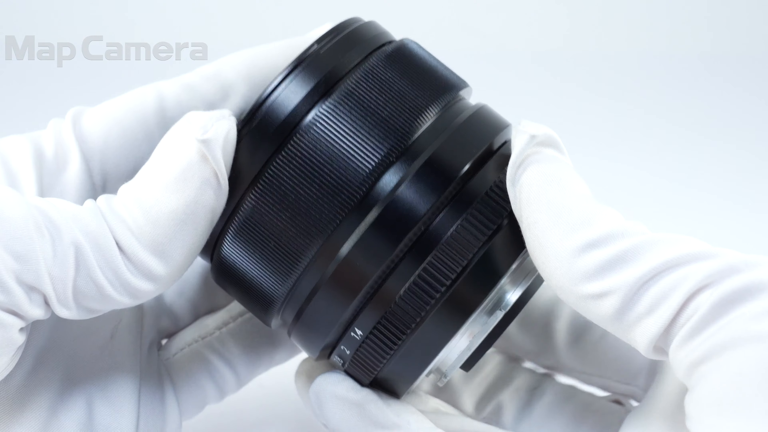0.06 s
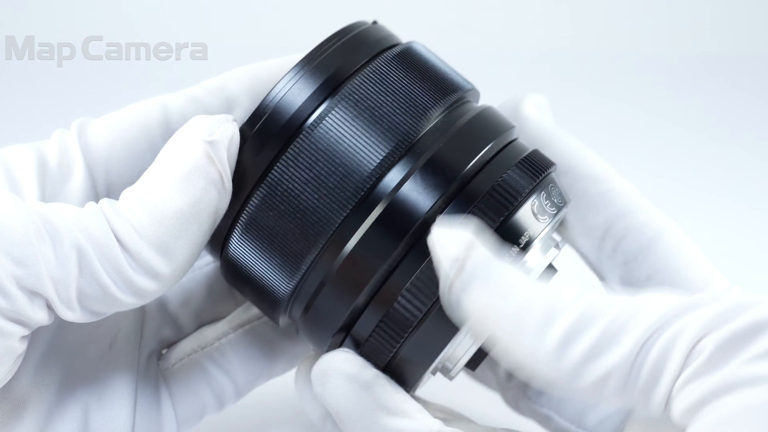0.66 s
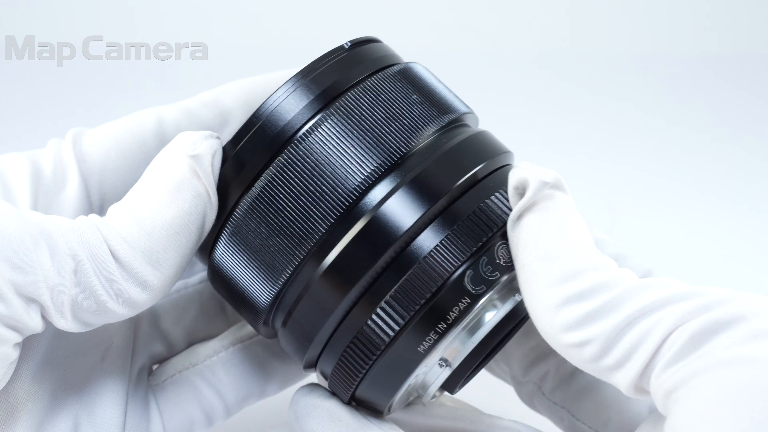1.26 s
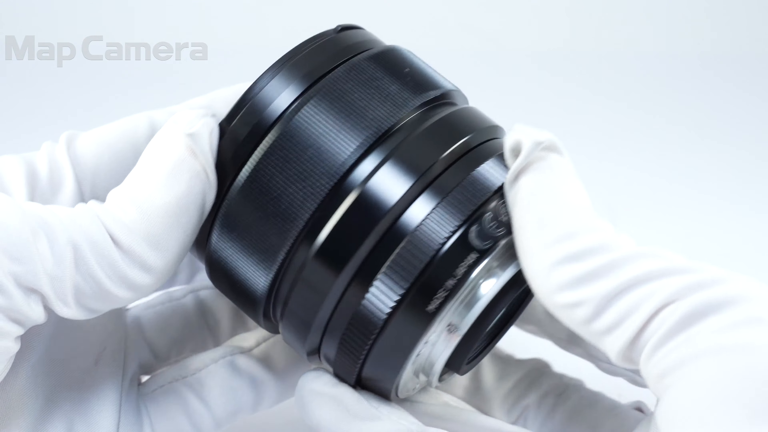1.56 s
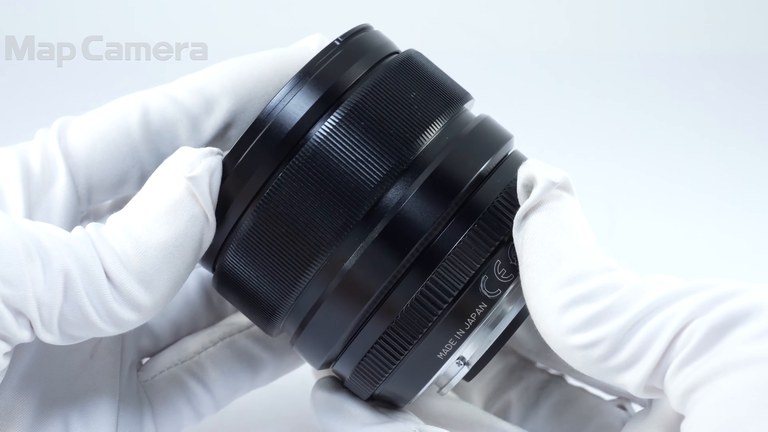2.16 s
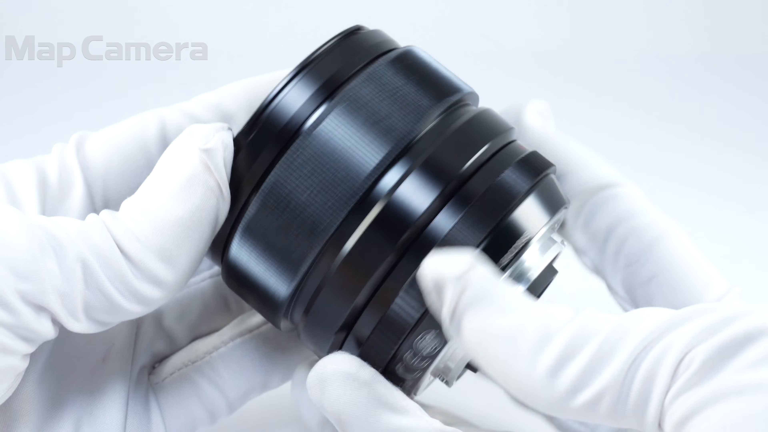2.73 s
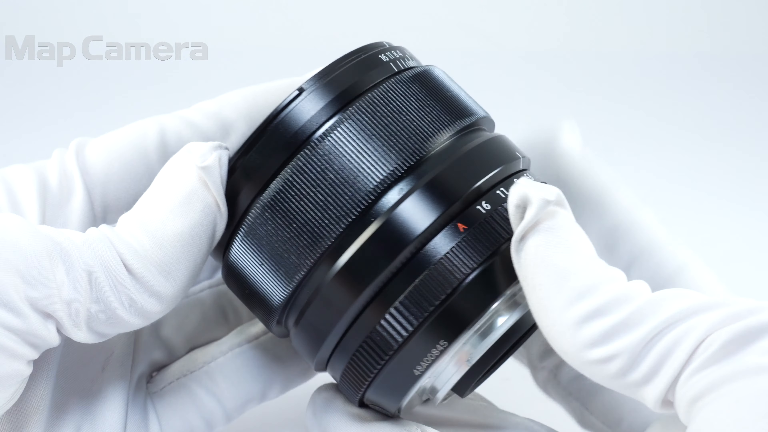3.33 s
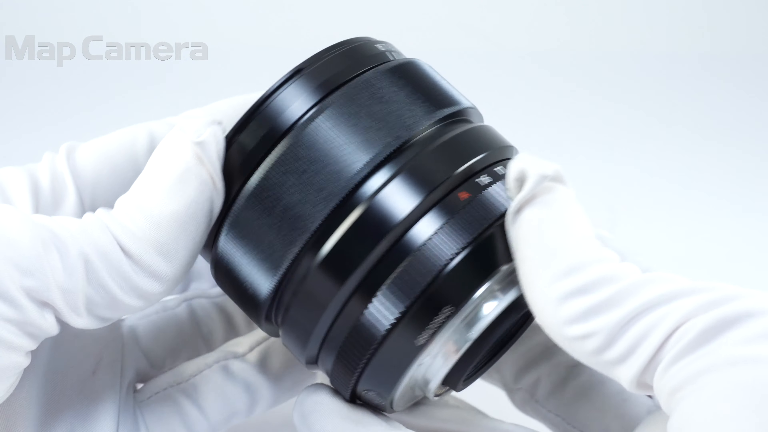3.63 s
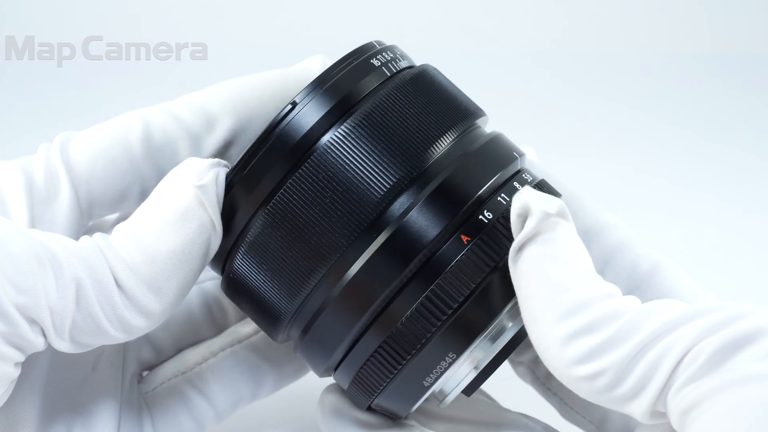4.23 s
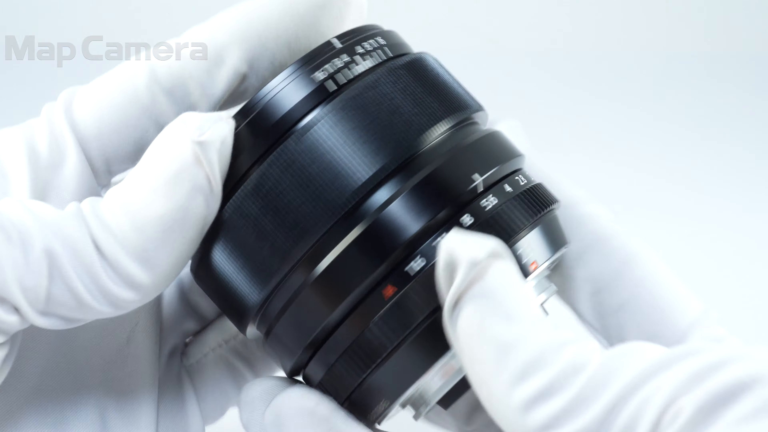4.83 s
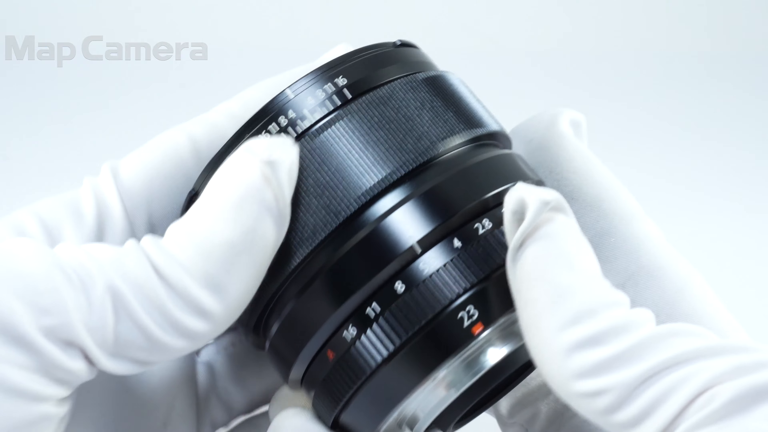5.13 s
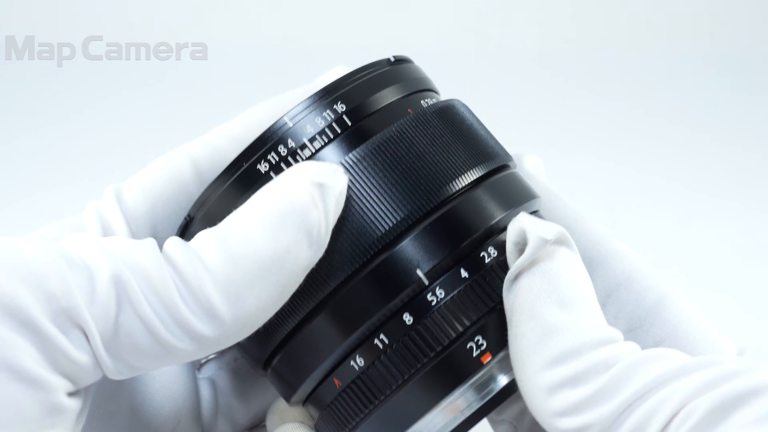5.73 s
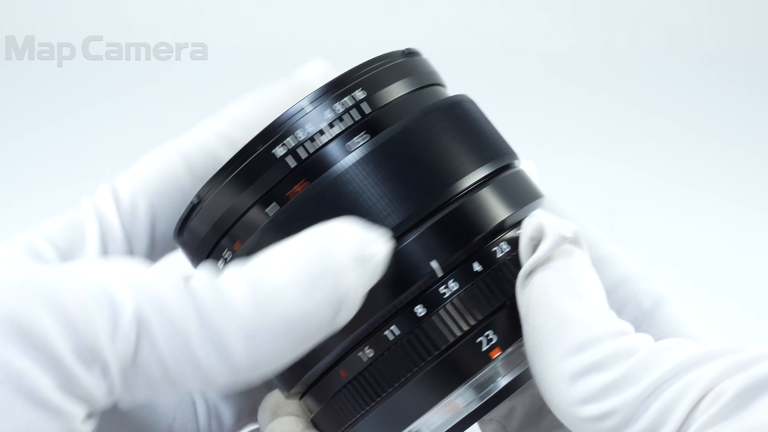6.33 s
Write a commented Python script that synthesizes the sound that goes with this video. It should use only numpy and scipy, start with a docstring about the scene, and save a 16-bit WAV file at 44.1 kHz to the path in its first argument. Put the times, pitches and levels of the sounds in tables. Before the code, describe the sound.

Gloved hands turn a camera lens close to the microphone in a small room with steady ventilation and a faint hum. Cotton hisses and rasps softly over the ribbed barrel in uneven strokes, with finger scuffs, dull bumps and a few faint squeaks. Near the end the focus ring snaps into place with one loud, sharp click, followed by a small tick and a brief hollow rub as it turns.

```python
"""A small, humming room, the microphone close in front of gloved hands turning a camera lens.
Cotton hisses, rasps and squeaks as it slides over the ribbed barrel; fingers scuff and bump it.
Near the end the focus ring is pulled back, skids over its detent and snaps into its seat, ringing
the barrel; then it ticks and is turned, rubbing in its track. Ventilation runs underneath."""
import sys
import numpy as np
from scipy import signal
from scipy.fft import rfft, irfft, next_fast_len
from scipy.io import wavfile
from scipy.ndimage import uniform_filter1d

SR = 44100
rng = np.random.default_rng(int(sys.argv[2]) if len(sys.argv) > 2 else 0)


def pcm_store(signal):
    """Save signal as 16-bit PCM."""
    levels = np.round(np.clip(np.atleast_2d(signal), -1, 1) * 32767)
    wavfile.write(sys.argv[1], SR, levels.astype(np.int16).T)


N = 290178
TIME = np.arange(N) / SR

# ventilation in the room: (frequency [Hz], relative level [dB])
AIR_SPECTRUM = [(20, -19), (40, -11), (65, 0.5), (90, 4), (125, -4), (165, -4.5), (230, 0), (320, 3.5),
                (700, -5.5), (1100, -6.5), (1750, -6.5), (2150, -14.5), (5000, -22.5), (16000, -29)]
# electrical hum and whine: (frequency [Hz], rms level [dB])
HUM_TONES = [(100, -59.5), (226, -63.5), (300, -63), (13205, -78.5)]
# cotton on the ribs, sliding lightly, dragged firmly, flicked fast: (frequency [Hz], relative level [dB])
HISS_SPECTRUM = [(900, -21), (2500, -13), (4500, -1.5), (7000, 2.5), (9000, -0.5), (11500, -3.5),
                 (14000, -7.5), (16000, -15)]
RASP_SPECTRUM = [(500, -16), (1200, -0.5), (2300, -1.5), (3700, 2.5), (5000, -3), (8000, -19.5),
                 (16000, -40)]
SHEEN_SPECTRUM = [(4000, -31), (8000, -4), (11300, 0), (12800, -4), (16000, -6)]
# slow drags of the barrel through the grip: (start [s], end [s], starting level [dB], pressure [0-1])
GLOVE_DRAGS = [(0.0, 0.023, -53, 0), (0.092, 0.303, -53.5, 0.59), (0.404, 0.582, -58.5, 0.63),
               (0.568, 0.665, -51.5, 0.53), (0.728, 0.867, -54.5, .55), (0.87, 1.042, -50, 0.4),
               (1.147, 1.24, -64, 0.2), (1.37, 1.54, -63.5, 0.4), (1.95, 2.278, -59.5, .45),
               (2.25, 2.855, -56.5, .5), (2.857, 3.257, -62, 0.47), (3.272, 3.34, -52, .33),
               (3.554, 3.73, -64, 0.8), (3.863, 3.933, -60, .35), (4.19, 4.3, -63.5, 0.8),
               (4.38, 4.445, -53.5, 0.37), (4.463, 4.657, -50.5, 0.63), (4.677, 4.916, -55.5, 0.48),
               (4.883, 5.37, -51.5, 0.72), (5.463, 5.515, -58.5, .6), (5.814, 5.876, -59.5, .8),
               (5.991, 6.1, -49.5, .7), (6.28, 6.582, -55.5, .6), (6.377, 6.483, -50, 0.8)]
# quick flicks over the ribs: (start [s], end [s], hiss [dB], rasp [dB], sheen [dB])
GLOVE_FLICKS = [(0.78, 0.802, -51, -54, -54), (0.918, 0.974, -45.5, -47, -59),
                (1.266, 1.35, -49.5, -56, -64), (1.33, 1.353, -44, -49, -44),
                (1.577, 1.609, -43.5, -51.5, -49), (1.624, 1.672, -47, -61, -47),
                (2.486, 2.573, -56, -76, -49), (3.348, 3.445, -49.5, -52, -57.5),
                (4.09, 4.188, -50, -53, -53.5), (5.014, 5.072, -49.5, -55, -50),
                (6.018, 6.056, -45, -44, -56)]
# handling bumps and, last, a very brief low thump under the snap as it overloads the recorder:
# (peak time [s], pitch [Hz], length [s], level [dB])
LOW_THUMPS = [(0.171, 240, 0.011, -41), (0.257, 293, 0.0079, -38), (0.28, 76.4, 0.017, -35.5),
              (0.323, 85, 0.019, -40), (2.972, 194, 0.011, -40), (3.218, 86, .02, -49),
              (3.391, 228, .02, -45), (4.031, 222, .025, -47), (5.603, 203, 0.0094, -35.5),
              (5.648, 131, 0.0027, -25.5)]
# fingers shifting their grip: (peak time [s], length [s], centre [Hz], width [Hz], level [dB])
FINGER_SCUFFS = [(0.193, 0.059, 230, 80, -46.5), (0.194, 0.13, 1190, 1200, -53),
                 (0.217, 0.085, 60, 60, -48.5), (0.412, 0.013, 250, 398, -49),
                 (0.773, 0.04, 1190, 1100, -50.5), (0.984, 0.019, 1690, 1000, -47),
                 (1.115, 0.018, 1300, 900, -55), (1.204, .015, 900, 900, -53),
                 (1.506, 0.012, 870, 696, -47.5), (1.937, .025, 1870, 1500, -52.5),
                 (2.347, 0.0044, 686, 700, -42.5), (2.354, 0.022, 786, 700, -46),
                 (2.372, .035, 480, 400, -47.5), (2.54, .06, 65, 50, -55), (3.501, 0.035, 420, 200, -47),
                 (4.338, 0.015, 1300, 650, -45), (4.355, 0.029, 402, 650, -44.5),
                 (4.69, 0.14, 302, 497, -50), (4.713, 0.068, 1110, 1100, -46),
                 (4.742, 0.012, 1670, 1500, -44.5), (4.811, 0.022, 1540, 1200, -49.5),
                 (5.41, 0.15, 224, 172, -50)]
# hard contacts inside the lens: (time [s], gain [dB], low edge [Hz], high edge [Hz])
LENS_CONTACTS = [(5.6454, -15, 1100, 7000), (5.6466, 1, 760, 12500), (5.6515, -6, 760, 3200),
                 (5.8793, -25.5, 1400, 3600), (5.8813, -31, 2500, 11000), (6.2125, -42, 3200, 9000),
                 (2.2, -35, 7000, 15000), (2.2275, -35, 7000, 15000), (3.603, -40, 8000, 15000)]
# modes of the barrel: (frequency [Hz], relative level [dB], t60 [s])
BARREL_MODES = [(870, -19, 0.026), (894, -5, 0.052), (1073, 2, 0.012), (1276, -10, 0.039),
                (1420, -21, 0.037), (1645, -11.5, 0.019), (1846, -11.5, 0.019), (2110, -6.5, 0.013),
                (2250, -10.5, 0.019), (2450, -17, 0.035), (2710, -14, 0.014), (3140, -25, 0.044),
                (3280, -28, 0.046), (3660, -24, 0.02), (4070, -19.5, 0.041), (4550, -19, 0.029),
                (4970, -10.5, 0.015), (5580, -38, 0.019), (7450, -38, 0.019), (7500, -36, .02),
                (9650, -41, 0.02), (10940, -20, .022), (13800, -24, .022)]
# the room's tail: (low edge [Hz], high edge [Hz], gain [dB], t60 [s])
ROOM_BANDS = [(480, 800, -15.5, 0.14), (1380, 4100, -11.5, 0.07), (3530, 6400, -14.5, 0.051),
              (7000, 16000, -15, 0.052)]
# cloth squeaking on the barrel: (peak time [s], length [s], pitch [Hz], level [dB])
CLOTH_SQUEAKS = [(2.903, 0.056, 3500, -57.5), (4.103, 0.041, 2740, -57.5), (6.047, 0.044, 3760, -50.5)]
# the ring's skid just before it seats: (time [s], length [s], level [dB], first pitch [Hz], last [Hz])
DETENT_SKID = (5.6438, .003, -17, 7700, 9000)
# grit in that skid: (frequency [Hz], relative level [dB])
GRIT_SPECTRUM = [(500, -42), (2000, -15), (4500, -11), (6500, 1), (8500, -16), (10000, -1.5), (12500, 0.5),
                 (14500, 4), (16000, -3.5)]
# the focus ring turning: (peak time [s], length [s], level [dB])
RING_TURN = (6.43, 0.11, -48)
# resonances of the ring's track: (frequency [Hz], width [Hz], relative level [dB])
TRACK_MODES = [(850, 83, 2), (1037, 77, -3.5), (3050, 540, -5), (8000, 1500, -10)]


def undb(db):
    """Decibels to gain."""
    return 10 ** (np.asarray(db) / 20)


def unit(x):
    """Scale to rms 1."""
    return x / np.sqrt(np.mean(x ** 2))


def colour(x, points):
    """Shape a steady sound by (frequency [Hz], level [dB]) points; rms 1."""
    hz, db = np.transpose(points)
    size = next_fast_len(len(x))
    bins_hz = np.maximum(np.fft.rfftfreq(size, 1 / SR), 1)
    gain = undb(np.interp(np.log(bins_hz), np.log(hz), db))
    return unit(irfft(rfft(x, size) * gain, size)[:len(x)])


def band(x, low_hz, high_hz, order=2):
    """Causal band-pass."""
    return signal.sosfilt(signal.butter(order, [low_hz, high_hz], "band", fs=SR, output="sos"), x)


def resonance(x, hz, width_hz):
    """One resonance driven by x; rms 1."""
    low_hz = np.hypot(hz, width_hz / 2) - width_hz / 2
    return unit(band(x, low_hz, low_hz + width_hz))


def wander(rate_hz):
    """A smooth random drift; rms 1."""
    hold = int(SR / rate_hz)
    steps = np.repeat(rng.standard_normal(N // hold + 1), hold)
    return unit(uniform_filter1d(uniform_filter1d(steps, hold), hold)[:N])


def swell(peak_s, length):
    """A bell-shaped rise and fall, `length` seconds wide at half power."""
    return 2 ** (-2 * np.minimum(((TIME - peak_s) / length) ** 2, 20))


def room_tone(air_db=-51.5):
    """Steady ventilation, a slightly wavering hum and a thin electrical whine."""
    air = colour(rng.standard_normal(N), AIR_SPECTRUM) * undb(air_db + 0.95 * wander(6.8))
    hum = sum(undb(db) * unit(np.sin(2 * np.pi * hz * TIME + 0.28 * wander(4.04)))
              for hz, db in HUM_TONES)
    return air + hum


def fibres(per_s, spread_db):
    """Threads catching and letting go: dense slips of uneven size."""
    slips = rng.random(N) < per_s / SR
    return unit(slips * rng.standard_normal(N) * undb(spread_db * rng.standard_normal(N)))


def slide(start, end, rise_s, fall_s):
    """Speed of the cloth, 0-1: it breaks loose, slides, and is caught again."""
    return (1 + np.tanh((TIME - start) / rise_s)) * (1 - np.tanh((TIME - end) / fall_s)) / 4


def pressed(pressure):
    """Gains of hiss, rasp and sheen in slow sliding: pressure turns hiss into rasp; no sheen."""
    return np.sqrt([1 - pressure, pressure, 0])


def gloves(grip_db=-69, sag_db_per_s=3, flutter_db=0.64):
    """Cotton hisses as it slides, rasps lower when pressed on the ribs and gains a sheen with speed."""
    creep = undb(grip_db - 0.5 * wander(5.3))  # the resting grip never quite stops
    power = np.outer(pressed(0.84), creep) ** 2  # rows: hiss, rasp, sheen
    for start, end, db, pressure in GLOVE_DRAGS:
        slowing = undb(-sag_db_per_s * np.maximum(TIME - start, 0))  # the hand slows as it drags
        speed = slowing * slide(start, end, rise_s=0.02, fall_s=0.035)
        power += np.outer(undb(db) * pressed(pressure), speed) ** 2
    for start, end, *levels_db in GLOVE_FLICKS:
        speed = slide(start, end, rise_s=0.017, fall_s=0.031)
        power += np.outer(undb(levels_db), speed) ** 2
    spectra = HISS_SPECTRUM, RASP_SPECTRUM, SHEEN_SPECTRUM
    cloth = sum(gain * colour(fibres(per_s=10000, spread_db=1), spectrum)
                for gain, spectrum in zip(np.sqrt(power), spectra))
    return cloth * undb(flutter_db * wander(70))


def thumps():
    """Dull, low pulses: bumps from handling, then a very brief thump under the snap's overload."""
    return -sum(np.cos(2 * np.pi * hz * (TIME - peak_s)) * swell(peak_s, length) * undb(db)
                for peak_s, hz, length, db in LOW_THUMPS)


def fingers():
    """Fingertips stick and slip in short scuffs."""
    out = np.zeros(N)
    for peak_s, length, hz, width_hz, db in FINGER_SCUFFS:
        scuff = resonance(fibres(per_s=5000, spread_db=1), hz, width_hz)
        out += scuff * swell(peak_s, length) * undb(db)
    return out


def barrel_ring(t):
    """The barrel's answer to one sharp push; the hands damp it quickly."""
    return sum(undb(db - 60 * t / t60) * np.sin(2 * np.pi * hz * t) for hz, db, t60 in BARREL_MODES)


def clicks(ring_db=-3, crack_db=-10, crack_s=0.0022):
    """Each contact inside the lens rings the barrel, with a brief crack of dense high modes."""
    out = np.zeros(N)
    t = TIME[:SR // 5]
    ring = barrel_ring(t) * undb(ring_db)
    for time_s, db, low_hz, high_hz in LENS_CONTACTS:
        crack = unit(band(rng.standard_normal(len(t)), 2100, 12000, order=1)) * np.exp(-t / crack_s)
        hit = band(ring + crack * undb(crack_db), low_hz, high_hz, order=4)
        start = int(time_s * SR)
        out[start:start + len(t)] += undb(db) * hit[:N - start]
    return out


def room_tail(x, delay_s=0.0024):
    """A short, dry tail comes back to the microphone from the table and the near walls."""
    t = TIME[:SR // 4]
    tail = 0
    for low_hz, high_hz, db, t60 in ROOM_BANDS:
        fade = undb(-60 * t / t60) * (t > delay_s)
        reflections = band(rng.standard_normal(len(t)), low_hz, high_hz)
        tail += undb(db) * reflections * fade / np.linalg.norm(fade)
    return signal.fftconvolve(x, tail)[:N]


def squeaks(relative_width=0.075):
    """Where the cloth sticks and slips almost evenly it gives a raspy note."""
    slips = fibres(per_s=7000, spread_db=3)
    return sum(resonance(slips, hz, relative_width * hz) * swell(peak_s, length) * undb(db)
               for peak_s, length, hz, db in CLOTH_SQUEAKS)


def skid(rise_s=0.0003, fade_s=0.0011, grit_db=3, side_db=2.5):
    """Metal squeals briefly upward over the detent, its grit spreading wide; returns mid and side."""
    start, length, db, start_hz, end_hz = DETENT_SKID
    t = np.maximum(TIME - start, 0)
    attack = 1 - np.exp(-t / rise_s)
    release = np.exp(-np.clip((t - length) / fade_s, 0, 20))
    push = undb(db) * attack * release
    pitch_hz = np.interp(t, [0, length], [start_hz, end_hz])
    squeal = unit(np.sin(2 * np.pi * np.cumsum(pitch_hz) / SR))
    mid_grit = undb(grit_db) * colour(rng.standard_normal(N), GRIT_SPECTRUM)
    side_grit = undb(side_db) * colour(rng.standard_normal(N), GRIT_SPECTRUM)
    return push * (squeal + mid_grit), band(push * side_grit, 4500, 17000)


def focus_ring():
    """The turning ring rubs in its track and keeps its hollow resonances sounding."""
    peak_s, length, db = RING_TURN
    slips = fibres(per_s=3500, spread_db=3)
    rub = sum(undb(mode_db) * resonance(slips, hz, width_hz) for hz, width_hz, mode_db in TRACK_MODES)
    return unit(rub) * swell(peak_s, length) * undb(db)


def scene():
    """Everything sits close and straight in front of the microphone; only the skid has stereo width."""
    skid_mid, side = skid()
    metal = clicks() + skid_mid
    mid = metal + room_tail(metal) + gloves() + squeaks() + fingers()
    mid += thumps() + focus_ring() + room_tone()
    return np.array([mid + side, mid - side])


def record(dry, top_hz=15900):
    """The snap just overloads the recorder; a steep low-pass cuts the top."""
    low_pass = signal.ellip(10, 0.1, 80, top_hz, fs=SR, output="sos")
    return signal.sosfilt(low_pass, np.clip(dry, -1, 1))


dry = scene()
out = record(dry)
pcm_store(out)
```